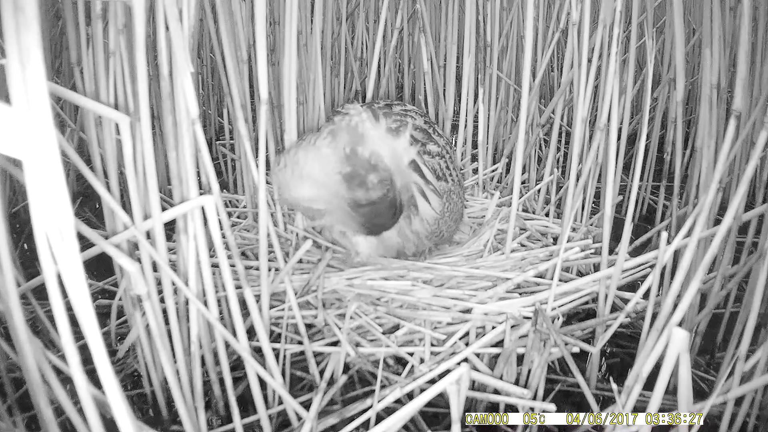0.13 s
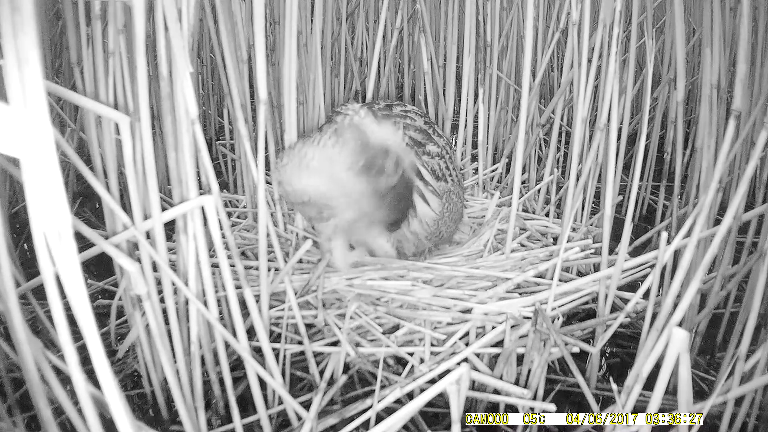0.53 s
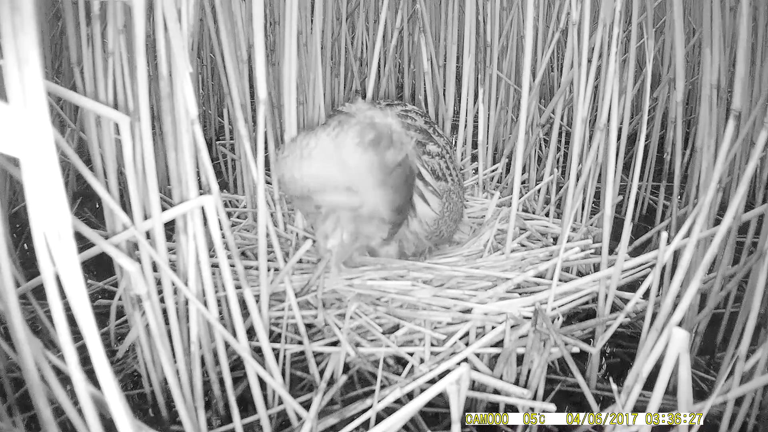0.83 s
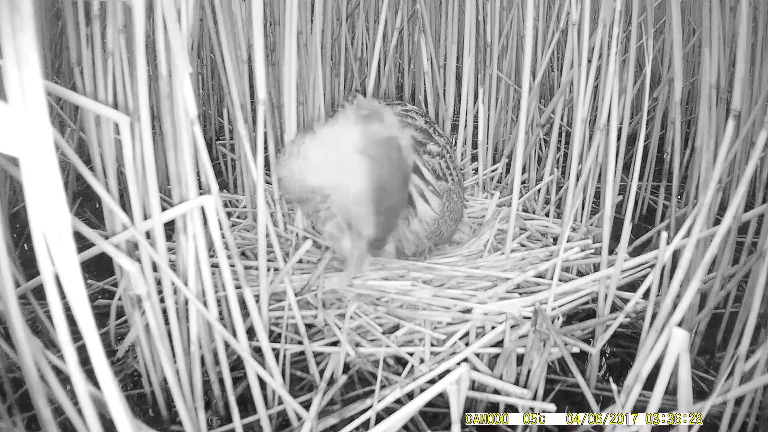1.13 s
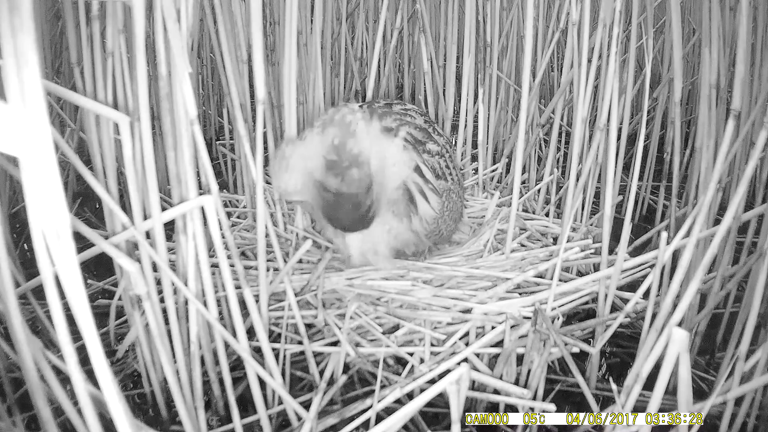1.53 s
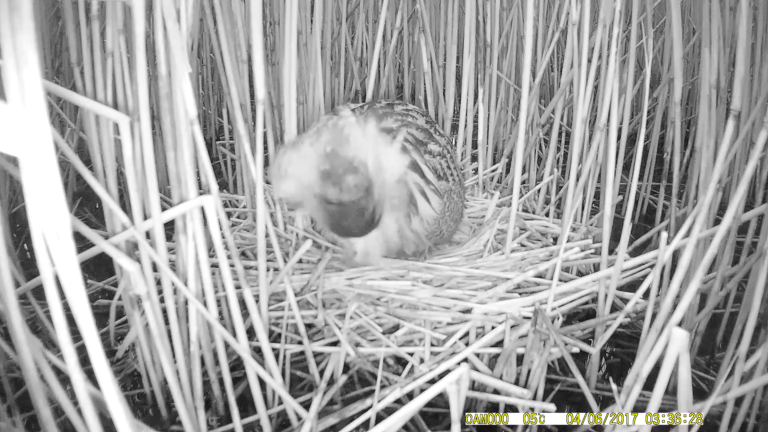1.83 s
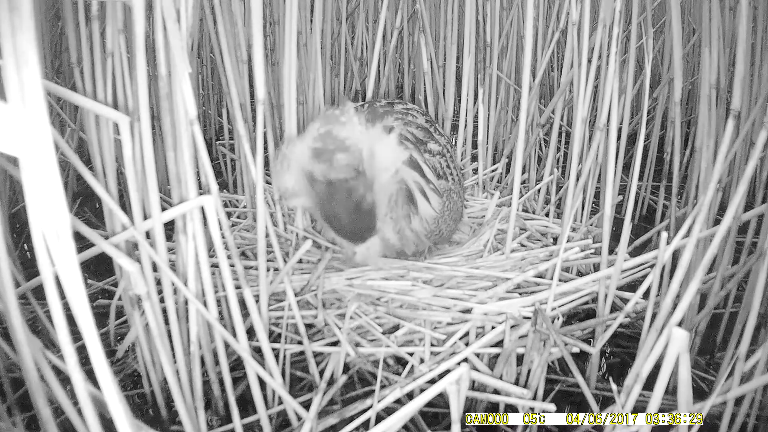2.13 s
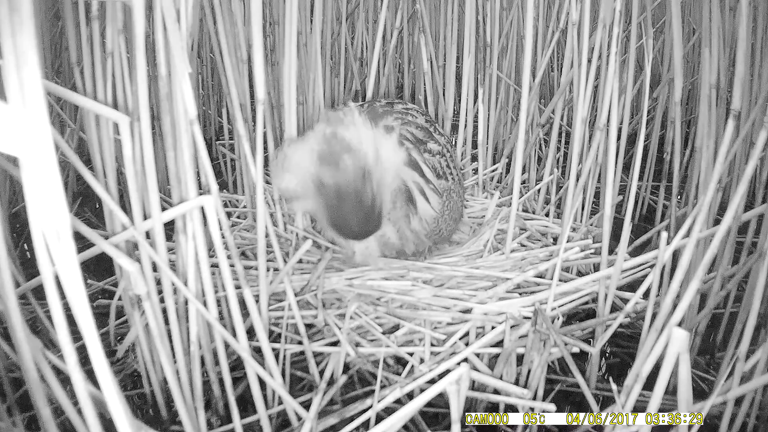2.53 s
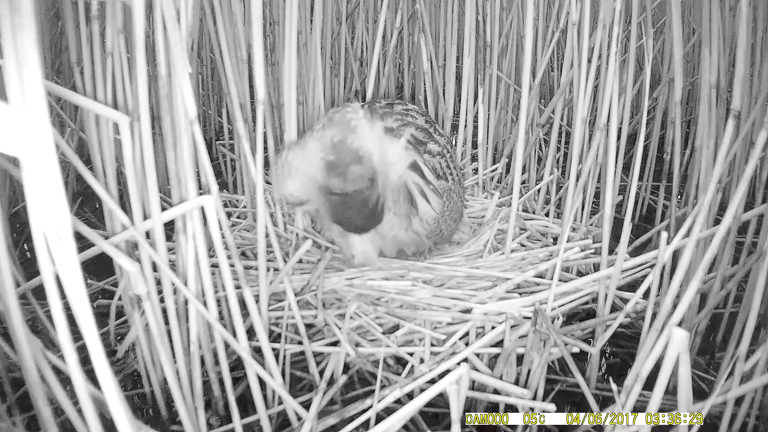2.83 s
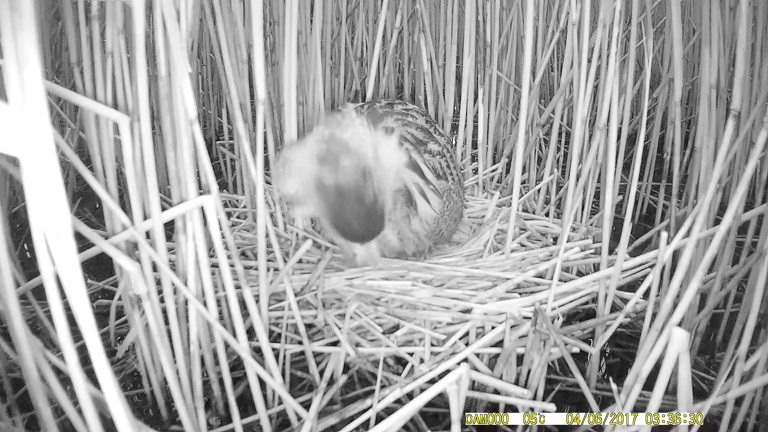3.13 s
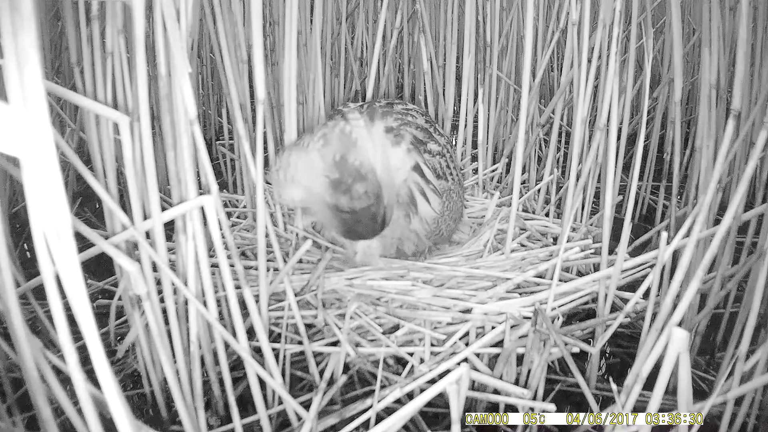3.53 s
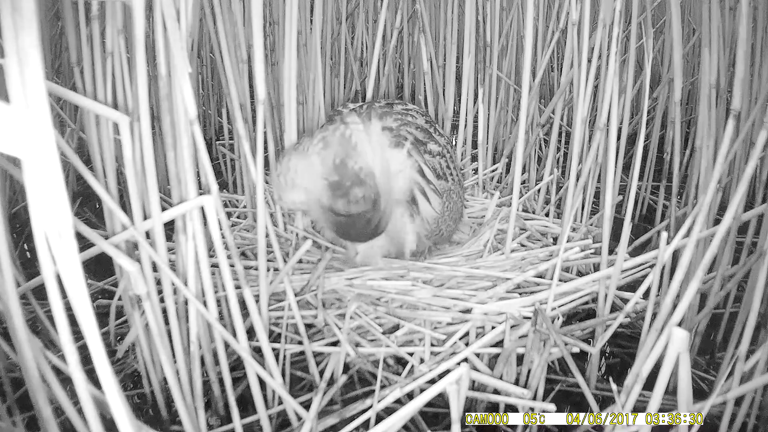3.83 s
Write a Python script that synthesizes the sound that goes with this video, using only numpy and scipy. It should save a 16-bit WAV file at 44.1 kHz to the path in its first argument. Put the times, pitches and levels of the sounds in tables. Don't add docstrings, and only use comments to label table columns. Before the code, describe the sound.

A reed warbler sings close by: thin whistles, rolling churrs, then harsh chattering, scolds and rattles.

```python
import sys
import numpy as np
from scipy import signal
from scipy.fft import rfft, irfft, next_fast_len
from scipy.io import wavfile
from scipy.ndimage import uniform_filter1d

SR = 44100
rng = np.random.default_rng(int(sys.argv[2]) if len(sys.argv) > 2 else 0)


def voltage_ratio(decibels):
    exponent = np.asarray(decibels, float) / 20
    return 10 ** exponent


def pcm_store(signal):
    levels = np.round(np.clip(np.atleast_2d(signal), -1, 1) * 32767)
    wavfile.write(sys.argv[1], SR, levels.astype(np.int16).T)


N = 176400


def colour(x, points):
    hz, db = np.array(points, float).T
    n = 2 * next_fast_len(len(x) // 2 + SR // 10)
    freqs = np.arange(n // 2 + 1) * SR / n
    gain = voltage_ratio(np.interp(np.log(freqs + 1), np.log(hz), db))
    cepstrum = irfft(np.log(gain), n)
    cepstrum[1:n // 2] *= 2
    cepstrum[n // 2 + 1:] = 0
    return irfft(rfft(x, n) * np.exp(rfft(cepstrum)), n)[:len(x)]


def band(x, hz, width):
    freqs = np.arange(N // 2 + 1) * SR / N
    y = irfft(rfft(x) * np.exp(-.5 * ((freqs - hz) / width) ** 2), N)
    return y / y.std()


def walk(rate):
    k = int(SR / rate)
    y = uniform_filter1d(uniform_filter1d(rng.standard_normal(N), k), k)
    return y / y.std()


def gate(start, length, edge):
    t = np.arange(N) / SR
    return np.clip(np.minimum(t - start, start + length - t) / edge, 0, 1)


# [f/Hz, width/Hz, level/dB]
ENGINES = [
    (93, 38, -50.5),
    (178.5, 45, -60),
]


def engines():
    t = np.arange(N) / SR
    out = np.zeros(N)
    for hz, width, db in ENGINES:
        fade_db = 4 * t * (hz < 120)
        sway_db = 1.5 * walk(22)
        out += voltage_ratio(db + sway_db - fade_db) * band(rng.standard_normal(N), hz, width / 2)
    return out


# [f/Hz, level/dB per Hz]
AIR = [(12, -30), (20, -7.5), (80, 3.5), (180, -0.5), (985, -20.5), (2330, -19), (3350, -13.5),
       (6020, -27.5), (15500, -34)]


def air():
    hiss = colour(rng.standard_normal(N), AIR)
    return voltage_ratio(-50.5) * hiss / hiss.std()


# [t/s, length/s, level/dB]
RUSTLES = [
    (.37, .05, -68),
    (0.47, 0.12, -67),
    (0.79, 0.28, -70),
    (1.568, .006, -70),
    (2.885, .02, -63),
]


def rustle():
    noise = band(rng.standard_normal(N), 10500, 4500) * voltage_ratio(9.8 * walk(110))
    return noise * sum(voltage_ratio(db) * gate(start, length, length / 3) for start, length, db in RUSTLES)


# [t/s, length/s, from f/Hz, to f/Hz,
# level/dB]
FAR_NOTES = [(0.985, 0.1, 4370, 4340, -58), (1.79, 0.11, 6250, 5200, -60), (2.92, .13, 6270, 7330, -58),
             (3.05, 0.065, 6260, 5300, -54), (3.1, 0.082, 5080, 5240, -53), (3.676, 0.04, 3920, 3900, -51),
             (3.185, .035, 4450, 4400, -52), (3.415, .045, 6900, 6300, -58), (.95, .04, 2200, 2200, -49),
             (1.565, .035, 3700, 3900, -55)]


def far_whistler():
    t, waver = np.arange(N) / SR, 1 + .02 * walk(446)
    out = np.zeros(N)
    for start, length, hz0, hz1, db in FAR_NOTES:
        hz = np.interp(t, [start, start + length], [hz0, hz1]) * waver
        out += voltage_ratio(db) * gate(start, length, 0.0084) * np.sin(np.cumsum(2 * np.pi * hz / SR))
    return out * voltage_ratio(0.9 * walk(90))


# [t/s, length/s, level/dB]
BUZZES = [(0.2062, 0.215, -53), (1.2062, .2, -51), (2.2075, .21, -53), (3.202, .215, -53)]


def buzzer():
    rate_hz, stroke_s = 82.2, .0038
    base_hz, drop_hz, drop_s = 5200, 5600, .0012
    back_s, back_db = .0068, -10
    t, out = np.arange(N) / SR, np.zeros(N)
    uneven, knock = voltage_ratio(2.9 * walk(90)), band(rng.standard_normal(N), 1500, 1600)
    for start, length, db in BUZZES:
        s = (t - start) % (1 / rate_hz)
        turns = base_hz * s - drop_hz * drop_s * np.exp(-s / drop_s)
        swell = np.sin(np.pi * np.clip(s / stroke_s, 0, 1)) ** .5
        stroke = swell * (np.sin(2 * np.pi * turns) + 0.75 * knock)
        tones = sum(np.sin(2 * np.pi * hz * s) for hz in (6500, 8600))
        back = np.exp(-((s - back_s) / 0.001) ** 2) * tones
        out += voltage_ratio(db + 2.5) * gate(start, length, 0.0017) * (stroke + voltage_ratio(back_db) * back)
    return out * uneven


# [f/Hz, level/dB]
STEMS = [(1200, -13.5), (2600, -0.5), (10000, 11)]


def reeds(x):
    near_t60_s, far_t60_s, far_db, gap_s = 0.14, 0.38, -13, 0.0023
    t = np.arange(SR // 2) / SR
    fall = voltage_ratio(-60 * t / near_t60_s) + voltage_ratio(far_db - 60 * t / far_t60_s)
    scatter = rng.standard_normal(len(t)) * rng.exponential(1, len(t)) ** 1.75
    echo = scatter * fall * np.clip(t / gap_s, 0, 1) ** 2
    echo /= np.sqrt(np.sum(echo ** 2))
    return x + voltage_ratio(-7) * signal.fftconvolve(colour(x, STEMS), echo)[:N]


# [f/Hz, level/dB]
AIR_LOSS = [(16000, -69)]


def sing(sides, rows, throat, sharp, couple, rough, breath, gain_db, upper=0.99):
    flow, jitter, noise = np.zeros(N), 1 + rough * walk(340), rng.standard_normal(N)
    luck = rng.standard_normal((len(rows), 4))
    sharps = np.clip([sharp, sharp * upper], .1, .97)
    for row, chance in zip(rows, luck):
        start, db, stretch, ratio = (tuple(row) + (1, 1))[:4]
        i = int(start * SR)
        t = np.arange(min(int(0.21 * stretch * SR), N - i)) / SR
        span = slice(i, i + len(t))
        puffs = []
        for side, (turn, off), r in zip(sides, chance.reshape(2, 2), sharps):
            s, hz, opening = np.array(side, float).T
            s = np.where(s > .012, .012 + (s - .012) * stretch, s)
            f = np.interp(t, s, hz) * ratio * (1 + rough / 2 * off) * jitter[span]
            phase = np.cumsum(2 * np.pi * f / SR) + 9 * turn
            puff = np.sqrt(1 - r * r) / (1 - r * np.cos(phase)) - 1
            valve = np.interp(t, s, np.clip(opening, 0, 2), left=0, right=0)
            puffs.append(valve * (puff + breath * noise[span]))
        mixed = couple * (len(puffs) - 1) * puffs[0] * np.tanh(2 * puffs[-1])
        flow[span] += voltage_ratio(db + gain_db) * (sum(puffs) + mixed)
    return colour(flow, throat + AIR_LOSS)


# [f/Hz, level/dB]
OPEN = [(900, -36.5), (1600, -25.5), (2200, -8.5), (2700, 1.5), (3900, -3.5), (4500, -8), (6000, -29.5),
        (9000, -27.5), (14000, -52)]
# [t/s, f/Hz, opening 0-1]
TICK = ([(0, 1760, 0), (.001, 1740, 0.83), (.003, 1700, .8), (.0045, 1660, 0.077)],)
# [t/s, peak level/dB]
TICKS = [(0.219, -32), (0.554, -42), (1.848, -21.5), (2.056, -20), (2.261, -21.5), (2.49, -24),
         (2.735, -25), (2.936, -26), (3.72, -19), (3.955, -20)]


def ticks():
    pairs = [(s, db - 2.5) for s, db in TICKS] + [(s + .007, db) for s, db in TICKS]
    return sing(TICK, pairs, OPEN, sharp=0.8, couple=0, rough=0.02, breath=0.3, gain_db=1.5)


# [f/Hz, level/dB]
WIDE = [(900, -47), (1400, -25), (2300, -23.5), (3000, -5.5), (4000, 3), (5300, -10.5), (7500, -35.5),
        (10500, -23.5), (13000, -26)]
# [t/s, f/Hz, opening 0-1]
WHISTLE = ([(0, 1170, 0.4), (.001, 1115, 1.76), (.004, 1207, 1.7), (.008, 1299, 1), (.105, 1328, 0.99),
           (.12, 1352, 0.33), (.127, 1360, 0.4)],)
# [t/s, level/dB, stretch in time, pitch ratio]
WHISTLES = [
    (0.018, -31.5, 0.24, .99),
    (0.107, -25.5, 1.023, .995),
    (0.36, -29.5, 0.36, 1.015),
    (0.446, -24.5, 1.03, 1.02),
]
# [t/s, effort level/dB]
EFFORT = [(0.017, -4), (0.037, 3), (.108, -0.5), (.122, -1), (.134, 5), (.146, -3), (.176, 2), (.225, 0.5),
          (0.361, -11.5), (0.376, 3), (.41, -4), (.448, -4), (0.477, 5), (.49, -4), (0.503, 0),
          (.512, -11.5), (.525, -1.5), (.535, -6), (0.557, -0.5)]


def whistles():
    effort = np.interp(np.arange(N) / SR, *np.array(EFFORT).T)
    tone = sing(WHISTLE, WHISTLES, WIDE, sharp=0.93, couple=0, rough=0.0046, breath=0.14, gain_db=2.5)
    return tone * voltage_ratio(effort + 0.46 * walk(150))


# [f/Hz, level/dB]
SHUT = [(800, -49), (1100, -29.5), (1400, -19), (2100, 3.5), (2500, 1.5), (2900, 3.5), (3600, -8.5),
        (5000, -20.5)]
# [t/s, f/Hz, opening 0-1]
CHURR = [
    [(0, 1085, 0), (.003, 1012, 0.42), (.015, 1085, 0.64), (.018, 1078, 0), (.021, 1460, 0), (.024, 1440, 0.54), (.032, 1437, 0)],
    [(0, 1955, 0.36), (.0015, 1824, 0.78), (.006, 1700, .4), (.009, 1530, 0.26)],
]
# [t/s, peak level/dB, stretch in time, pitch ratio]
CHURRS = [(0.753, -22.5, 0.85, 0.98), (0.7888, -19.5, 0.9, 0.99), (0.8237, -18, 1.05, 1),
          (0.8602, -16.5, 1.19, 0.98), (1.0862, -20.5, 1.07, 1.03), (1.1225, -18.5, 1.08, 1.0),
          (1.1605, -16.5, 0.96, .98), (1.197, -17.5, 1.19, 0.99)]
# [t/s, peak level/dB]
CHURR_ENDS = [
    (.895, -22),
    (1.234, -29.5),
]
# [t/s, peak level/dB]
LEAD_INS = [(0.7, -41), (.717, -27.5), (0.725, -35), (0.74, -36), (1.035, -37), (1.052, -25.5),
            (1.073, -36), (0.887, -29), (1.231, -24)]


def churrs():
    roll = dict(sharp=.75, couple=0.6, rough=0.018, breath=0.3, gain_db=4.5)
    half = (CHURR[0][:4], CHURR[1])
    return (sing(CHURR, CHURRS, SHUT, **roll) + sing(half, CHURR_ENDS, SHUT, **roll)
            + sing(CHURR[1:], LEAD_INS, SHUT, sharp=0.62, couple=0, rough=0.054, breath=0.83, gain_db=4))


# [f/Hz, level/dB]
GAPE = [(900, -37), (1700, -26.5), (2300, -23), (3000, -2.5), (3700, 4.5), (4600, -1), (6200, -30.5),
        (10500, -32.5)]
# [t/s, f/Hz, opening 0-1]
CHIP = [
    [(0, 1556, 0), (.004, 1525, 0.7), (.009, 1515, 0.3), (.016, 1491, 0.14), (.024, 1428, 0.5), (.043, 1422, 0.19), (.05, 1400, 0)],
    [(0, 1295, 0), (.003, 1292, 0.48), (.011, 1604, 1.5), (.021, 1855, 1.2), (.030, 1810, 0.7), (.037, 1662, 0.14)],
]
# [t/s, peak level/dB]
CHIPS = [
    (1.402, -14),
    (1.61, -14),
]


def chips():
    return sing(CHIP, CHIPS, GAPE, sharp=0.76, couple=0.51, rough=0.0059, breath=0.19, gain_db=4.5, upper=0.88)


# [t/s, f/Hz, opening 0-1]
CHEK = [
    [(0, 1496, 0.56), (.0025, 1494, 0.96), (.011, 1384, 0.82), (.017, 1324, 0.25), (.024, 1180, 0)],
    [(0, 2118, 0), (.003, 1926, 0.86), (.008, 1640, 1), (.013, 1500, .5), (.018, 1350, 0.84)],
]
# [t/s, peak level/dB, stretch of the tail]
CHEKS = [(1.8783, -16, 0.16), (1.9082, -13.5, 1), (1.9576, -12.5, 1.24), (2.082, -16.5, 0.28),
         (2.1109, -12, 0.7), (2.162, -12.5, 1.5), (2.2932, -14.5, 0.62), (2.3223, -13.5, 0.96),
         (2.373, -13, 1.2), (2.5197, -16, 1.2), (2.548, -13, 1.1), (2.6002, -13.5, 1.18),
         (2.7631, -16, 0.3), (2.7908, -12.5, 1.1), (2.846, -17, 0.21)]


def cheks():
    return sing(CHEK, CHEKS, OPEN, sharp=0.75, couple=0.5, rough=0.012, breath=0.2, gain_db=2.5, upper=.9)


# [f/Hz, level/dB]
HARSH = [(900, -45), (1500, -22.5), (2300, -23), (3200, -0.5), (4300, 4), (5500, -9.5), (7500, -29.5),
         (11000, -29.5)]
# [t/s, f/Hz, opening 0-1]
SCOLD = [
    [(0, 1330, 0), (.01, 1320, .3), (.034, 1300, 1), (.041, 1280, 0), (.053, 1470, 0), (.056, 1420, .85), (.088, 1390, .6), (.1, 1385, 0)],
    [(.003, 1650, 0), (.012, 1640, .3), (.033, 1590, .6), (.042, 1760, 1.8), (.0455, 1850, .4), (.054, 2100, .3), (.062, 2000, 0)],
]
# [t/s, peak level/dB, stretch in time, pitch ratio]
SCOLDS = [
    (3.221, -16.5, 1.0, .995),
    (3.452, -16, 0.95, 1.02),
]


def scolds():
    grate = sing(SCOLD, SCOLDS, HARSH, sharp=0.88, couple=0.9, rough=0.012, breath=0.4, gain_db=-1, upper=.78)
    return grate * voltage_ratio(2.0 * walk(175))


# [t/s, f/Hz, opening 0-1]
RATTLE = [
    [(0, 1299, 0.061), (.003, 1380, 0.6), (.007, 1270, .7), (.011, 1070, 0.0053)],
    [(0, 1942, 0.5), (.003, 1820, 0.29), (.006, 1650, .7), (.009, 1545, 0.6)],
]
# [t/s, peak level/dB]
RATTLES = [(2.965, -17), (2.993, -10.5), (3.003, -18), (3.014, -15), (3.025, -13.5), (3.054, -14.5),
           (3.73, -40), (3.735, -17.5), (3.749, -13), (3.762, -14.5), (3.799, -10), (3.816, -13.5),
           (3.828, -10), (3.839, -21), (3.867, -15.5), (3.961, -22.5), (3.969, -20), (3.984, -15),
           (3.996, -10)]


def rattles():
    after_s, after_db = 0.02, -3.5
    stutters = [(s + after_s, db + after_db) for s, db, _ in CHEKS[1::3]]
    return sing(RATTLE, RATTLES + stutters, OPEN,
                sharp=0.56, couple=0.55, rough=0.016, breath=0.093, gain_db=10.0)


def warbler():
    return whistles() + churrs() + chips() + cheks() + scolds() + rattles() + ticks()


def scene():
    buzz, wet = buzzer(), .4
    ringing = reeds(warbler() + far_whistler() + rustle() + wet * buzz)
    return (ringing + (1 - wet) * buzz + air() + engines())[None]


def band_limit(x):
    return signal.sosfilt(signal.butter(12, 15660, fs=SR, output="sos"), x)


def record(dry):
    top_cut = signal.ellip(8, .2, 70, 15500, fs=SR, output="sos")
    mix = signal.sosfilt(top_cut, dry)
    return band_limit(mix)


dry = scene()
out = record(dry)
pcm_store(out)
```